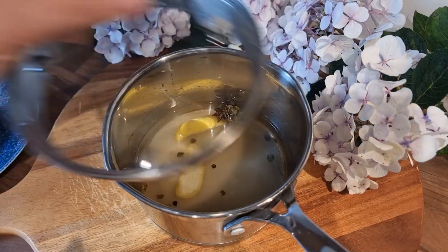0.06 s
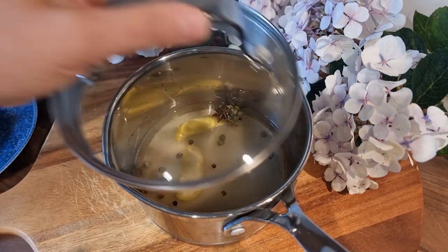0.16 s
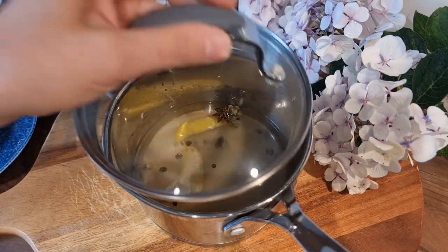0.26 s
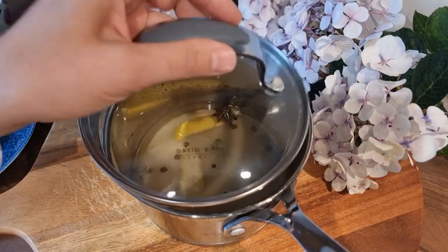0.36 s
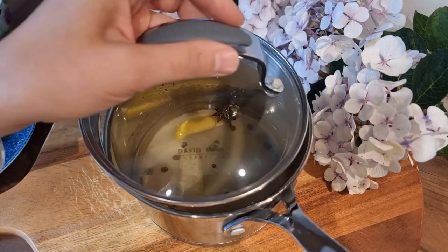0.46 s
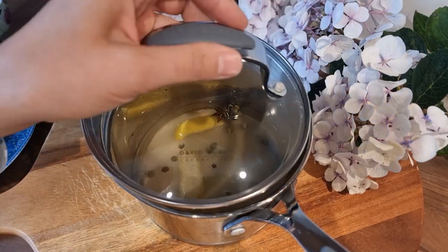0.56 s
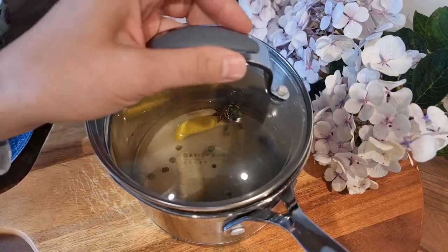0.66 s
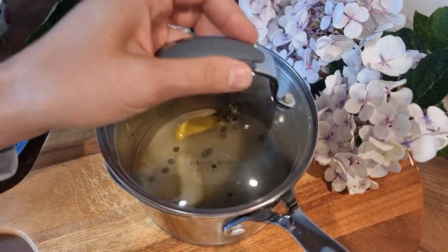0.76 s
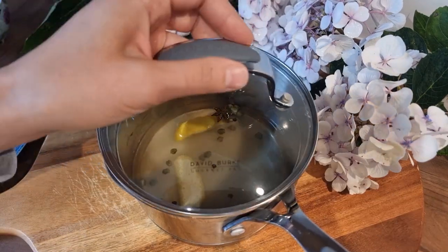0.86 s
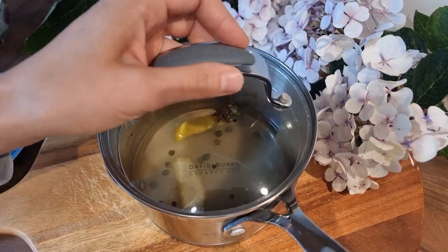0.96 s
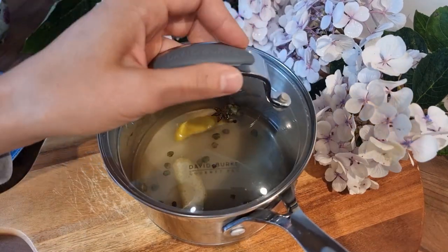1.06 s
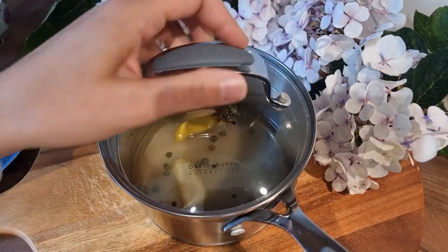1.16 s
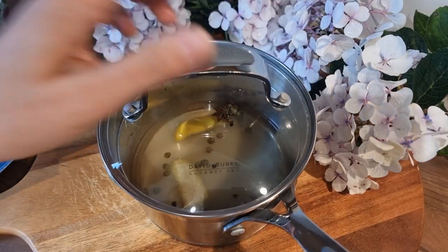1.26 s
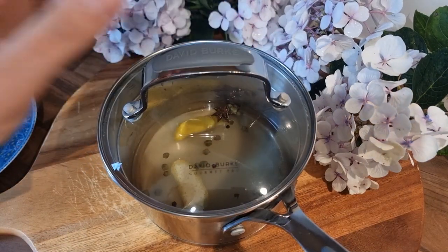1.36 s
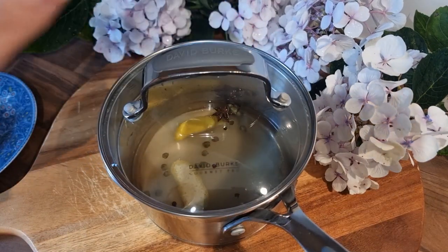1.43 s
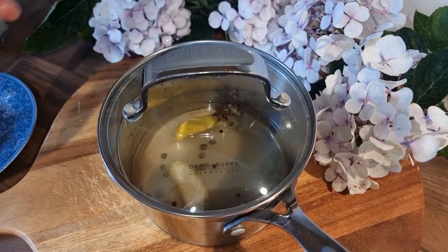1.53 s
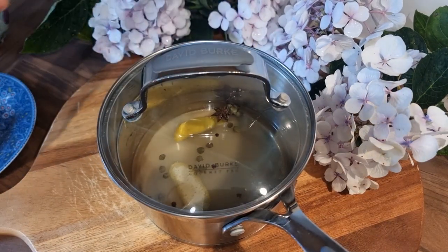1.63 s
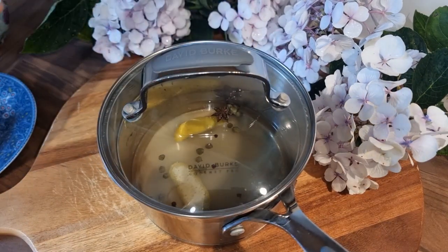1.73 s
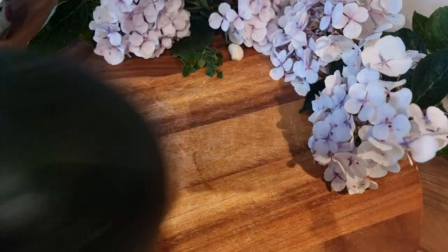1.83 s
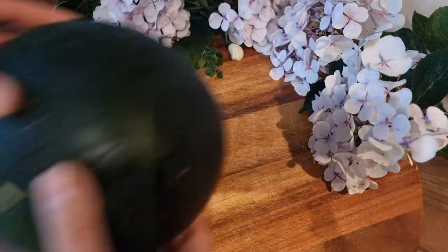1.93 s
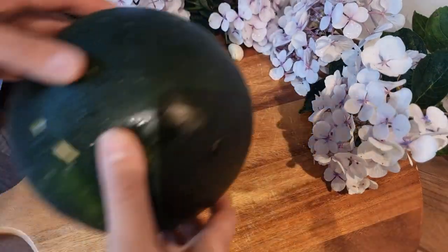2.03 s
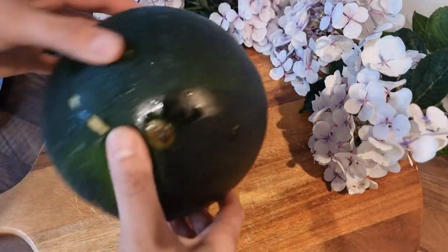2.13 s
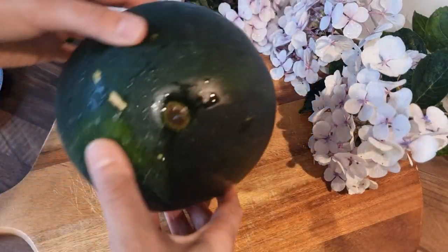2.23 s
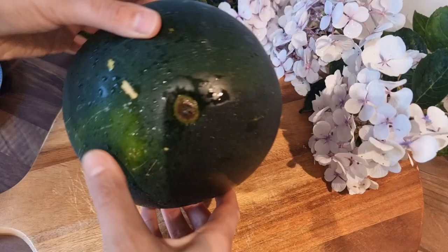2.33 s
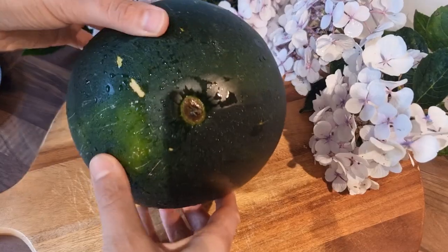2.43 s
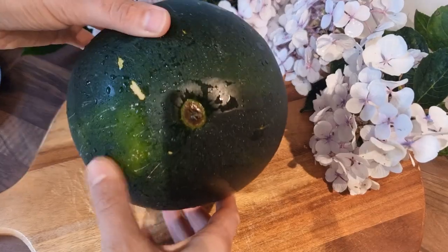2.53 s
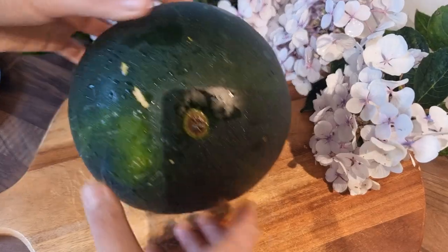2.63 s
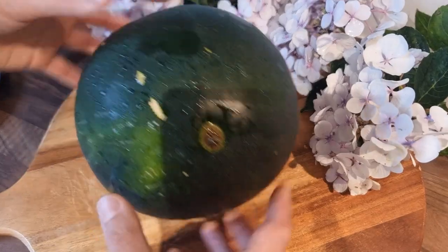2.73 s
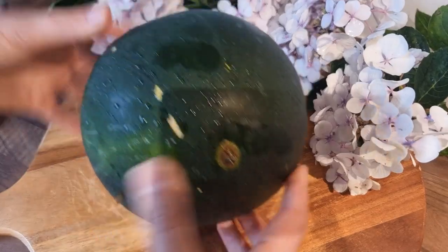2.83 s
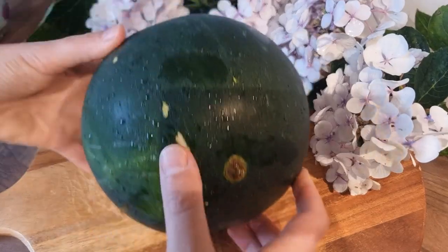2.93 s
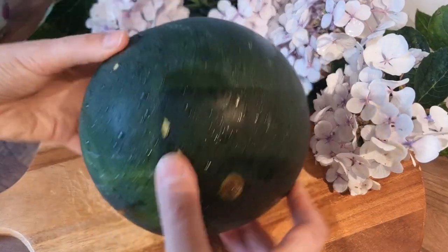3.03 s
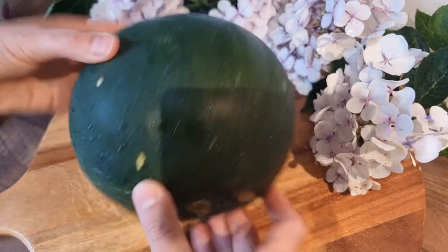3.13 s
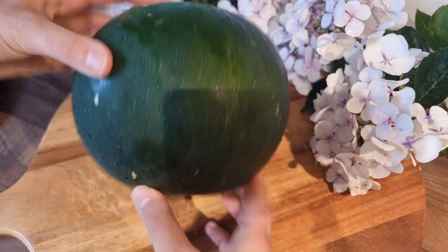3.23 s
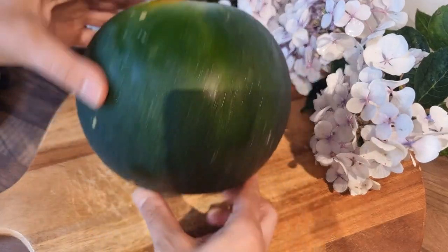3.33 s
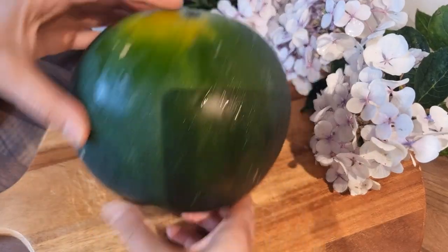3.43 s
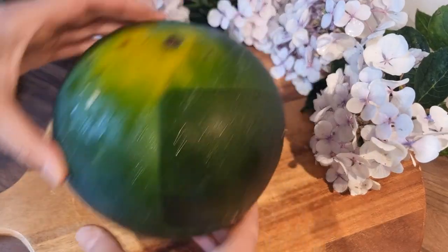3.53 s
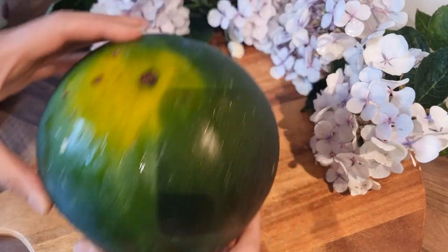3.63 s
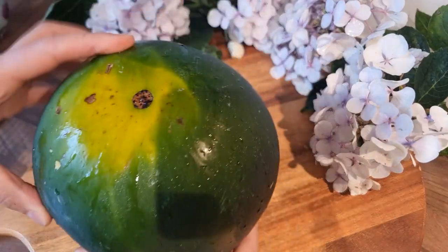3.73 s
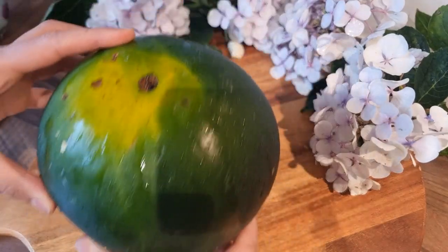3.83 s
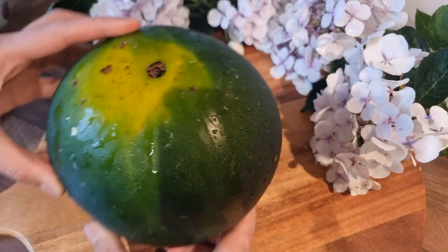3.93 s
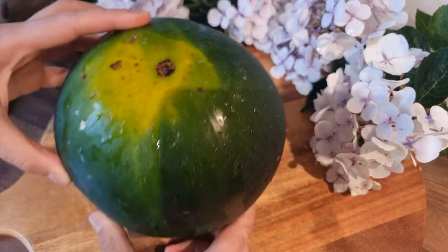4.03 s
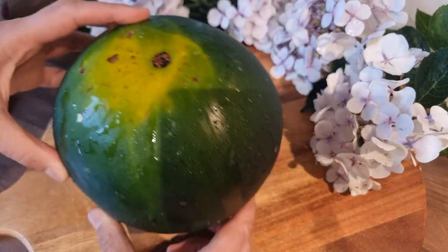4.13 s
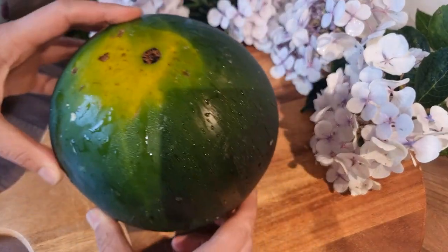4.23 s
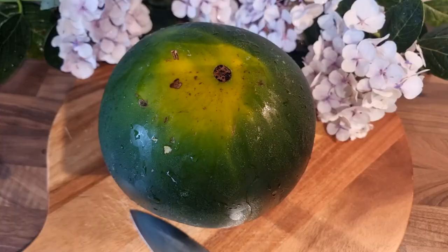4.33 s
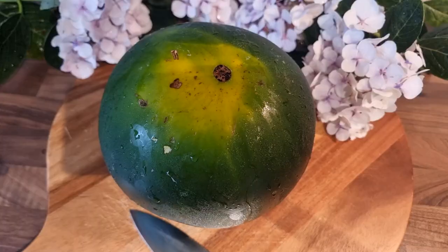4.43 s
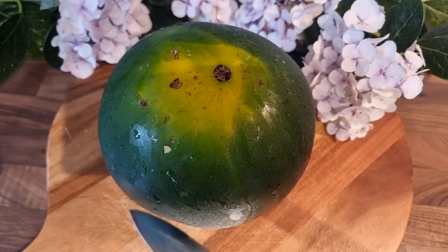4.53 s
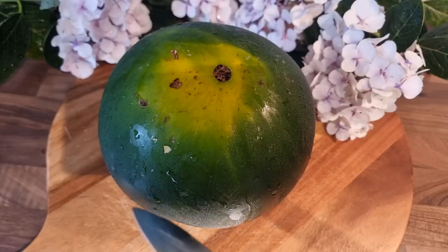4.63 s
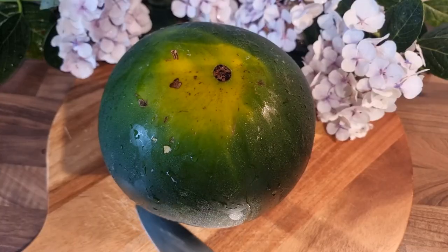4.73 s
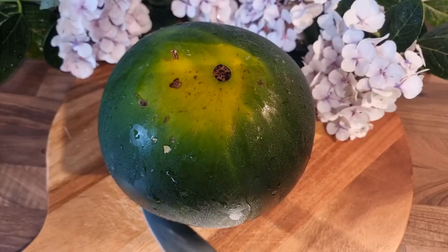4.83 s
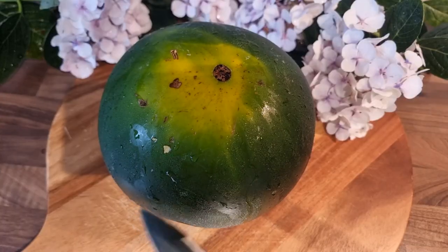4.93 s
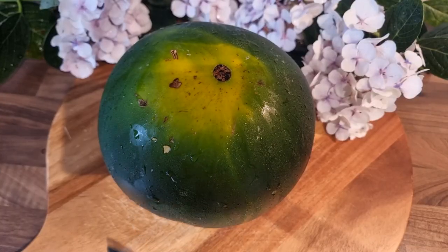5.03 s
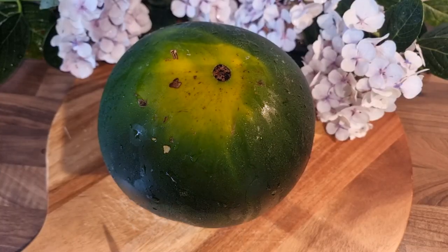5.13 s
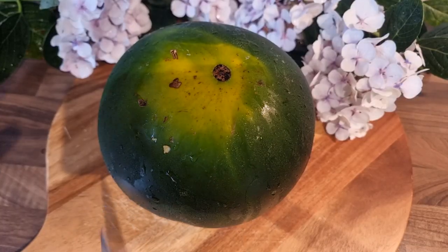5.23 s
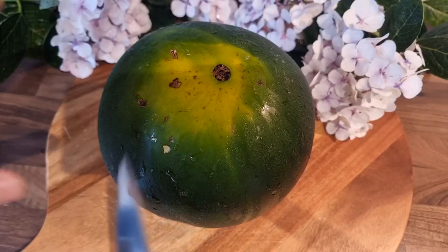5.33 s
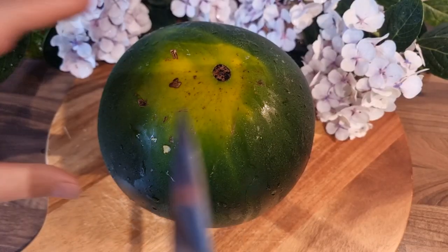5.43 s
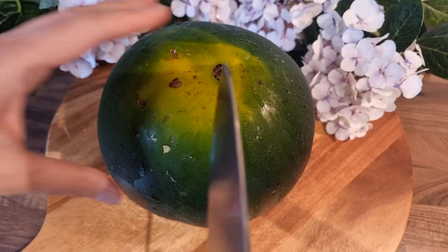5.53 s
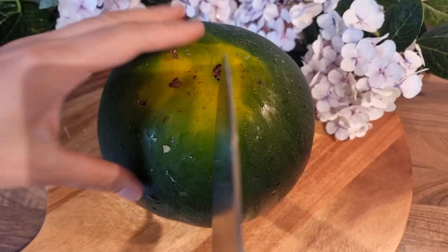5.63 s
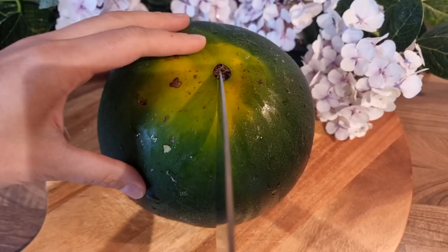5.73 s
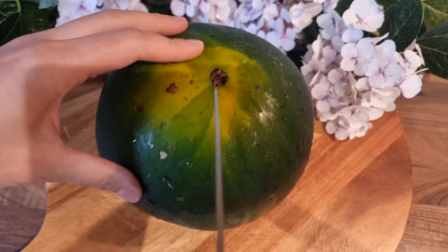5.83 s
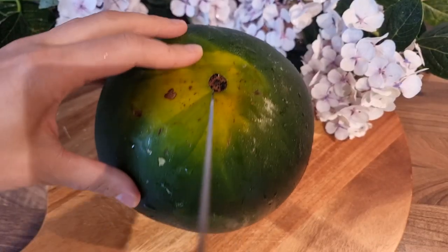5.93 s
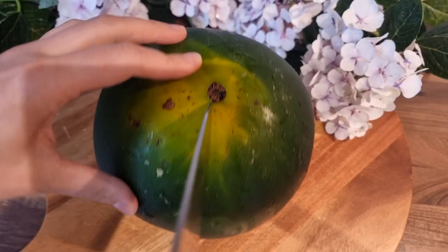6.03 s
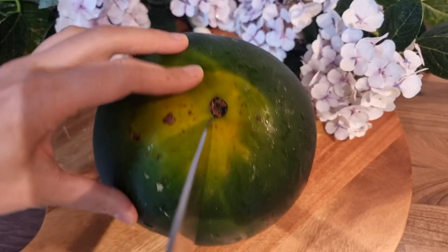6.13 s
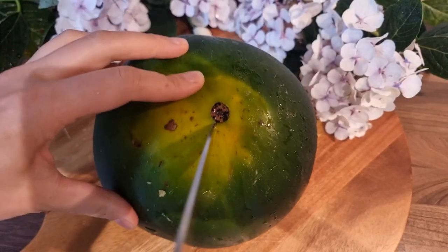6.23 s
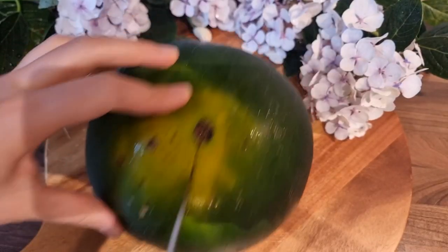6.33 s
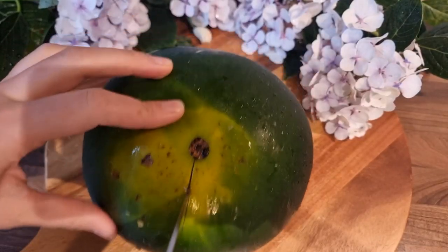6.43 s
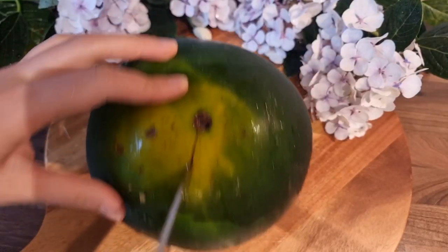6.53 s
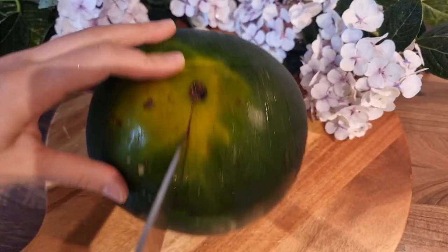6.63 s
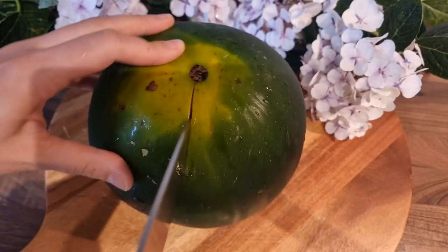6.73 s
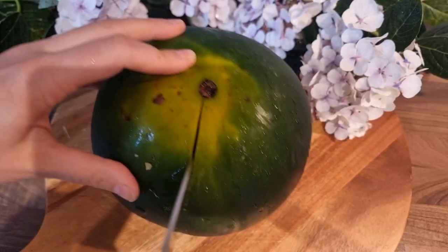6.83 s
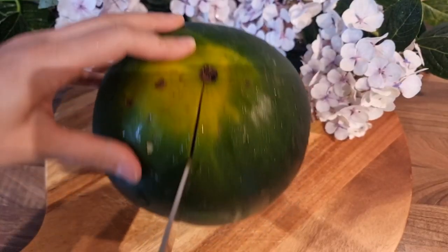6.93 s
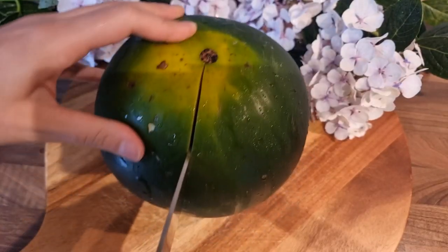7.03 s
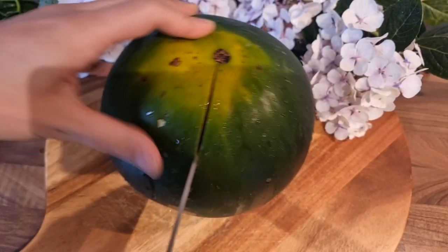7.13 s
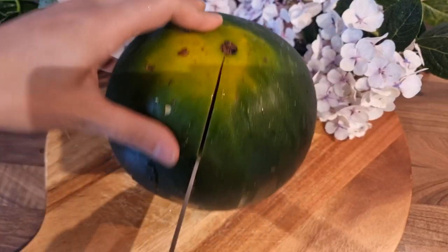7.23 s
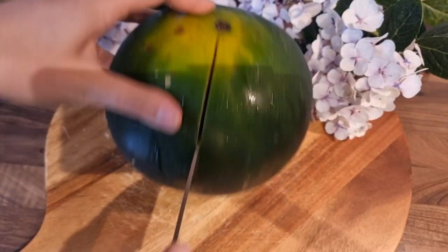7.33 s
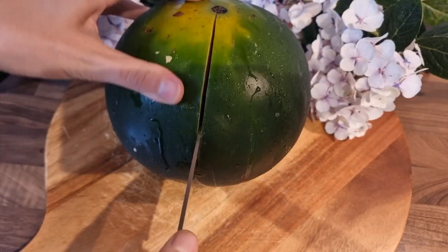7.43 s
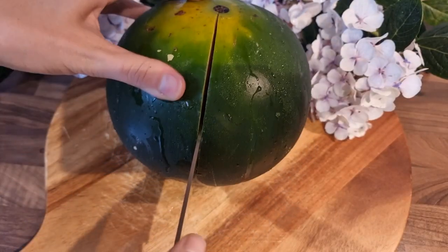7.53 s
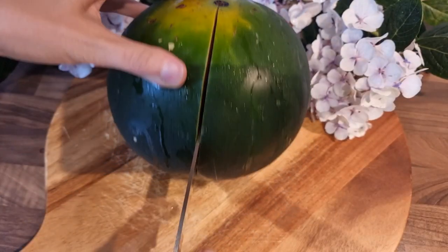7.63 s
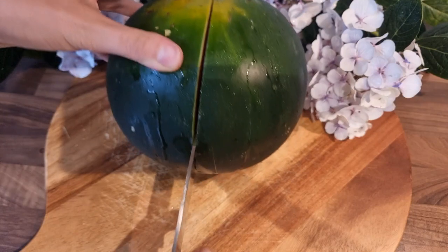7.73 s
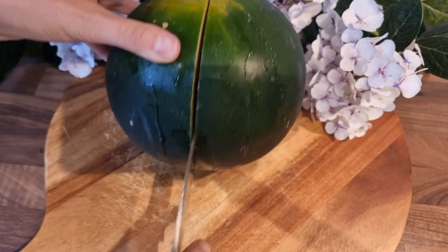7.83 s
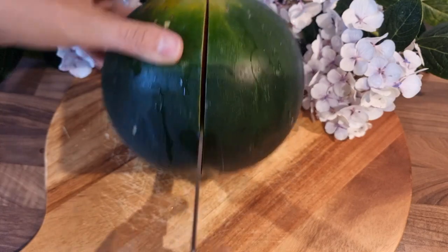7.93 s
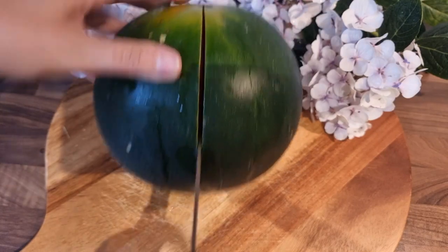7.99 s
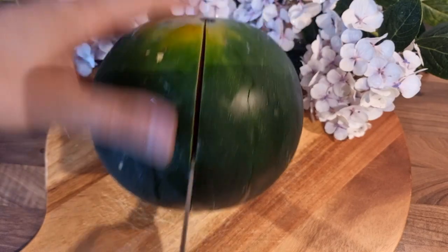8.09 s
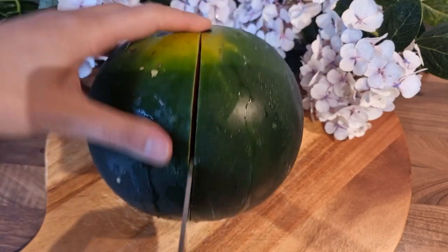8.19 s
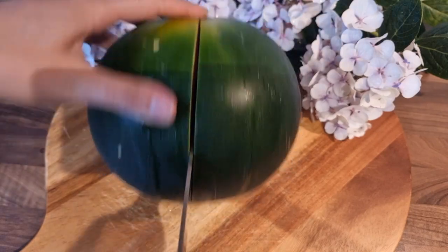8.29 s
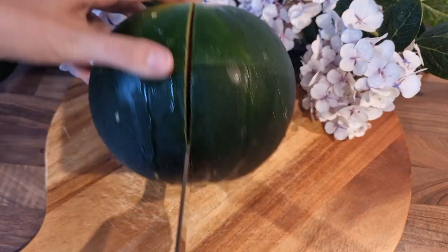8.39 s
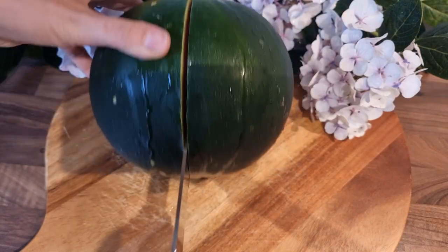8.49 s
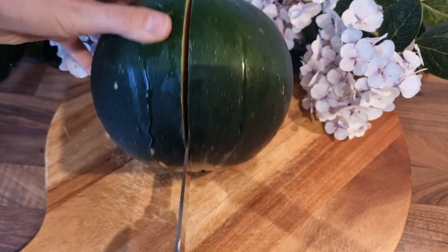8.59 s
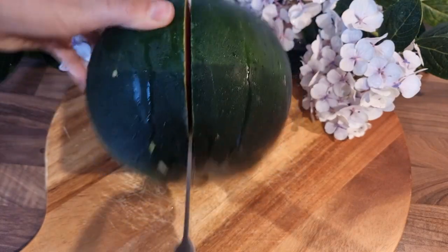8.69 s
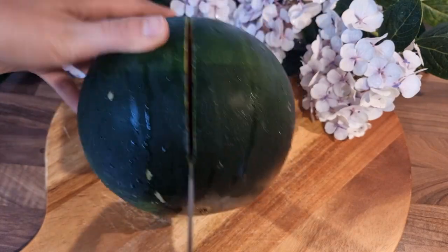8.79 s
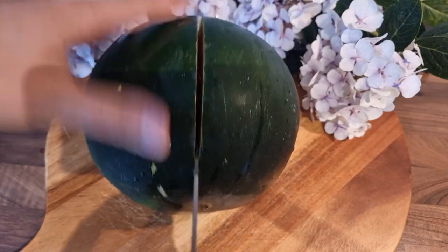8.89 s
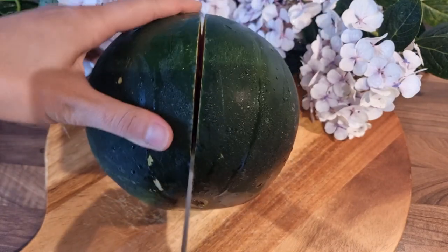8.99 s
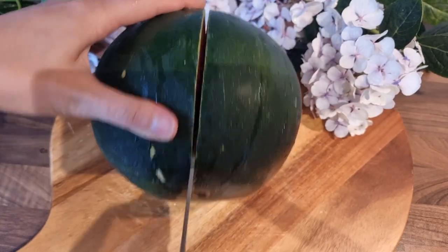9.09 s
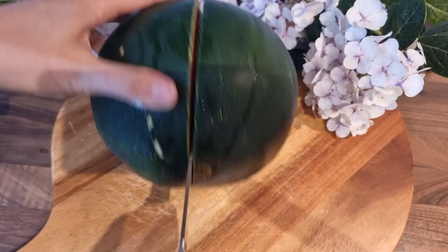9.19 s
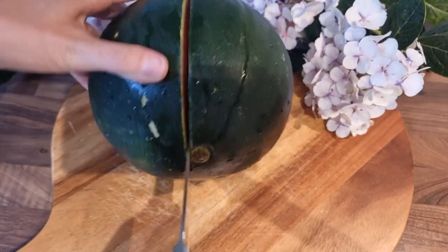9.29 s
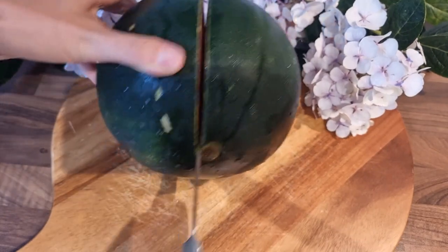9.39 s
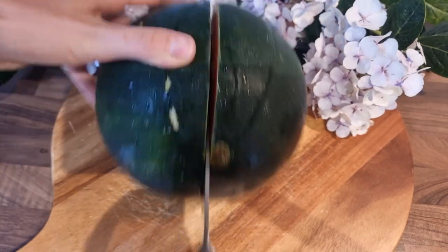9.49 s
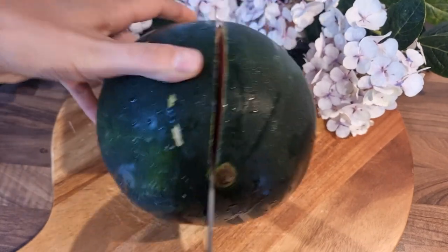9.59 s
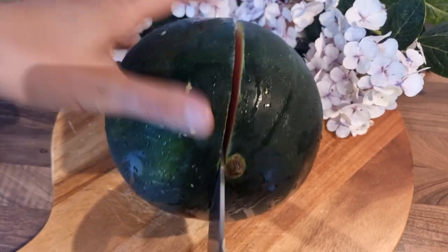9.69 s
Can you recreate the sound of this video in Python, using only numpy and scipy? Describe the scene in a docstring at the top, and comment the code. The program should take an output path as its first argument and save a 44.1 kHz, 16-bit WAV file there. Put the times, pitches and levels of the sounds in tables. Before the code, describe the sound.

Pan lid rattles into place, a short silence, soft bumps of a heavy melon on wood, then crisp, wet splitting cracks under a knife.

```python
"""Saucepan lid and watermelon in a kitchen

Two scenes. First a glass lid rattles into place on a steel saucepan: damped modes of rim and pan, and sliding noise.
Then a watermelon is turned on a wooden board, a knife is picked up and splits the rind: board and blade modes,
bursts of spikes and splinter noise that ring the fruit, and gritty tearing. Diffuse noise makes the air and
the appliance hiss, wavering sines the hum. The sound fades to silence and back twice, once between the scenes."""
import sys
import numpy as np
from scipy import signal
from scipy.fft import rfft, irfft, next_fast_len
from scipy.io import wavfile
from scipy.ndimage import map_coordinates

SR = 44100
rng = np.random.default_rng(int(sys.argv[2]) if len(sys.argv) > 2 else 0)


def int16_out(signal):
    """Quantize to a 16-bit WAV file."""
    q = np.round(np.clip(np.atleast_2d(signal).T, -1, 1) * 32767)
    wavfile.write(sys.argv[1], SR, q.astype(np.int16))


N = 429975

# All table levels are relative: the sources offset them and the output gain follows.
# Lid meeting the rim: start_s, level_db, thud_re_clink_db
LID_CONTACTS = [(0.3883, -19.5, 2), (.397, -17.5, -5), (.411, -18, -2.5), (.422, -21, -1.5),
                (.436, -37.5, -11.5), (0.529, -28.5, -14), (.544, -29.5, 0), (.739, -41.5, -4.5),
                (.79, -29.5, -8), (0.8053, -13.5, 3.5), (.822, -24.5, 4), (.950, -27, -4.5),
                (.956, -25, -4), (.963, -19, -1.5), (.975, -19, 1), (.990, -29.5, 3), (1.015, -39.5, 2.5)]
# Where the lid lands; thuds mostly deepen, clinks jump between bright and dull:
# time_s, thud_centre_hz, clink_centre_hz
LID_SEATING = [(.39, 416, 3240), (0.41, 410, 4730), (.422, 400, 2380), (.54, 437, 2870), (.74, 400, 2400),
               (.79, 310, 6170), (0.804, 310, 2240), (.83, 313, 2340), (.97, 255, 1270)]
# Modes of rim and lid: pitch_hz, level_db, t60_s
RIM_MODES = [(1033, 0, 0.056), (1305, -4.5, .1), (1367, -6, 0.14), (1401, -9, 0.11), (1645, -7.5, 0.06),
             (1880, -13.5, 0.051), (2170, -17, 0.08), (2347, -8.5, 0.12), (2413, -8.5, 0.13),
             (2570, -14.5, 0.17), (2740, -22, 0.18), (3284, -10.5, 0.13), (4000, -17, .2),
             (4720, -14, 0.16), (4870, -17, 0.12), (5100, -18, .12), (5800, -20.5, .15), (6170, -11.5, .15),
             (6900, -9, 0.19), (7550, -15, 0.15)]
# Modes of pan, liquid and the board under it: pitch_hz, level_db, t60_s
PAN_MODES = [(75, -3, .2), (117.1, -1.5, 0.28), (195, -4.5, 0.15), (251, -1.5, 0.1), (300.5, 0.5, 0.082),
             (383.4, -1.5, 0.09), (471, -1, 0.078), (563, 0, 0.11), (701, -2, 0.069), (783, 3.5, 0.075),
             (843, -0.5, 0.12)]
# Top of the clatter spectrum: frequency_hz, level_db
CLATTER_TOP = [(7000, -5.0), (9500, -5.0), (14500, 0.5), (16300, -21)]
# Lid sliding on the rim: time_s, level_db
LID_SLIDE = [(.45, -68), (.6, -64), (.675, -59), (.71, -47.5), (.758, -50.5), (.785, -57.5), (.83, -51.5),
             (.9, -56.5), (.936, -55), (1.1, -79.5)]
# Resonances of the rim under the sliding lid: centre_hz, width_hz, level_db
SCRAPE_BANDS = [(370, 59, -6.5), (1410, 120, -15.5), (2350, 260, -4), (3300, 110, -20), (3970, 120, -20),
                (4900, 320, -22)]
# Cracks of the rind: start_s, level_db, fruit_re_crack_db
RIND_CRACKS = [(6.336, -18.5, -12.5), (6.3428, -29.5, -17), (6.4984, -30, -19), (6.699, -38, -19),
               (6.749, -34, -13), (6.7621, -24, -22), (6.7805, -23, -21.5), (6.796, -24, -25),
               (6.8203, -21, -28), (6.8422, -24, -17), (6.8644, -25, -28), (6.898, -23.5, -26),
               (6.9191, -21, -22), (6.9571, -20, -18.5), (6.9936, -21, -26.5), (7.0613, -22.5, -54),
               (7.1446, -23, -29), (7.184, -22.5, -28), (7.237, -18.5, -26), (7.2759, -15, -27),
               (7.3124, -17, -31), (7.3476, -12.5, -22), (7.4082, -15, -24.5), (7.57, -37, -26),
               (7.5852, -15.5, -25), (7.635, -15.5, -24.5), (7.661, -15.5, -24.5), (7.6869, -17.5, -24),
               (7.792, -12.5, -27), (8.3788, -16.5, -23.5), (8.4264, -19.5, -22), (8.4495, -18.5, -23.5),
               (8.4878, -19, -29), (8.497, -21, -30), (8.512, -14.5, -25.5), (8.55, -17.5, -25.5),
               (9.0883, -30.5, -20.5), (9.11, -25.5, -31), (9.133, -14.5, -18.5), (9.1452, -10.5, -22),
               (9.184, -8.5, -15.5), (9.2178, -9, -20), (9.2356, -15, -15.5), (9.2458, -29, -31),
               (9.272, -21.5, -22.5)]
# Spectrum of snapping rind: frequency_hz, density_db (per Hz)
SNAP_SPECTRUM = [(150, -28), (300, -12), (580, -26), (850, -12), (1050, -17.5), (1400, -9.5), (3500, -8),
                 (4800, -13), (6900, -15), (9200, -22.5), (11000, -22.5), (13000, -16.5), (15500, -19),
                 (16500, -46.5)]
# How thin the cracks sound along the cut: time_s, bass_cut_db_per_octave (below 6 kHz)
CRACK_BASS_CUT = [(6.34, 10), (6.5, -0.5), (6.9, -0.5), (7.3, -1), (7.8, -1), (8.43, 1.5), (8.55, 3.5),
                  (9.13, -0.5)]
# Modes of the hollow fruit: pitch_hz, level_db, t60_s
FRUIT_MODES = [(150, -9.5, 0.068), (247, -11, 0.18), (365, -7.5, 0.064), (575, 5, 0.063), (860, 13, 0.033),
               (1201, 9.5, 0.035), (1870, 0, 0.055), (2700, -1, 0.035), (3650, -4, 0.025)]
# Bright pings with some cracks: start_s, level_db, pitch_hz, t60_s
CRACK_PINGS = [(6.337, -28, 6660, 0.024), (7.0637, -33.5, 6500, 0.063)]
# Pushes of the blade: start_s, end_s, tearing_db
BLADE_PUSHES = [(6.762, 6.917, -47), (7.213, 7.313, -51), (7.605, 7.714, -49.5), (8.104, 8.11, -60),
                (8.381, 8.503, -50), (9.111, 9.2, -47)]
# Squeaks of the tip going in: time_s, level_db, pitch_hz
TIP_SQUEAKS = [(6.278, -45, 4150), (6.287, -39, 4000), (6.299, -48, 4040), (6.317, -35, 3900)]
# Modes of the knife blade: pitch_hz, level_db, t60_s
BLADE_MODES = [(1435, -5, 0.13), (2600, 16.5, 0.028), (3440, 1, 0.16), (5636, -7, .15), (5916, -6, 0.32),
               (7200, -17, .2), (7800, -24, .15)]
# Fruit, hands and knife on the board:
# start_s, level_db, pitch_hz, tick_re_bump_db, left_minus_right_db, rise_s (time constant)
BOARD_BUMPS = [(2.054, -28, 390, -21, 2, 0.003), (2.054, -40, 973, -6, -2, .002),
               (2.078, -28, 350, -15, -2, 0.0075), (2.135, -38, 616, -6.5, -1, 0.0034),
               (2.136, -31, 83.4, -27, 1, 0.0049), (2.174, -29, 100, -30, -6, 0.0053),
               (2.866, -34, 205, -8, -2, 0.0025), (2.867, -32, 1900, -30, -2, .001),
               (2.866, -36, 3350, -30, -5, .001), (2.884, -32.5, 1890, -1, -1, 0.00068),
               (2.925, -38, 570, -18, -3, .0026), (3.299, -37, 69.6, -20, 11, 0.0057),
               (3.5155, -20, 778, -22, -5.5, 0.005), (3.537, -39, 790, -18, -5, .006),
               (4.645, -33.5, 687, -7, -11, 0.011), (4.664, -31, 214, -7, -2, 0.018),
               (4.682, -33.5, 546, -20, -5, 0.0064), (4.835, -39, 780, -20, 3, 0.0092),
               (4.855, -32, 548, -20.5, 1, .008), (4.87, -35.5, 193, -25, -1, 0.0058),
               (4.905, -41, 188, -27, -2, 0.0054), (4.955, -39.5, 254, 5, -2, 0.0084),
               (5.697, -30.5, 308, -6, 1.5, 0.00051), (5.703, -28.5, 235, -32, -5, 0.0029),
               (5.929, -49, 298, 5, -4, 0.011), (7.351, -36, 251, -31, -1, 0.0037),
               (8.82, -42, 790, -21, -6, 0.007), (8.97, -37, 613, -17, 2, 0.0077),
               (9.2, -30, 154, -28, -2, 0.0043)]
# Damping of the board: frequency_hz, t60_s
BOARD_DAMPING = [(60, 0.16), (120, 0.08), (240, 0.17), (310, 0.15), (380, 0.053), (800, 0.05), (1900, .07)]
# Spectrum of a bump's hard edge: frequency_hz, density_db (per Hz)
TICK_SPECTRUM = [(200, -14), (700, -2), (1150, 4.5), (1450, 1), (1900, 3), (2500, -2), (3300, -6.5),
                 (4000, -6), (4700, -5), (6000, -10), (9000, -21), (14000, -26.5)]
# Handling of the fruit: time_s, rumble_db
HANDLING = [(1.9, -62), (2.05, -52.5), (2.2, -55.5), (2.58, -60.5), (3.0, -56), (3.15, -54), (3.3, -57),
            (3.7, -58.5), (4.3, -60), (4.75, -56), (5.1, -59.5), (5.9, -55), (6.2, -57), (7.35, -54.5),
            (7.95, -56.5), (9.2, -54.5), (9.75, -56.5)]
# Spectrum of the fruit rumbling: frequency_hz, density_db (per Hz)
RUMBLE_SPECTRUM = [(12, -37), (20, -13), (60, -5.5), (173, -4.5), (296, -17.5), (400, -63), (520, -58.5),
                   (880, -120)]
# Spectrum of wet rind rubbing: frequency_hz, density_db (per Hz)
RUB_SPECTRUM = [(180, -15), (300, -4), (354, -12), (656, -6), (2050, -14), (8000, -28), (10400, -52),
                (17600, -120)]
# Decay of the room: frequency_hz, t60_s
WALL_DECAY = [(150, 0.42), (1000, 0.22), (5000, 0.21), (14000, 0.18)]
# Spectrum of the air at the stove: frequency_hz, density_db (per Hz)
AIR_SPECTRUM = [(20, -24), (40, -12.5), (72, -15.5), (102, -8.5), (130, -17), (400, -25), (800, -30),
                (2000, -43.5), (7000, -49.5), (9000, -61), (16000, -57)]
# Level of the air and of the room dying away after the lid's hits: time_s, bass_db, treble_db (above 300 Hz)
AIR_LEVEL = [(0, -69, -75.5), (.37, -70, -73), (.5, -54, -62.5), (1.1, -62, -62), (1.3, -64, -66),
             (1.6, -62.5, -68.5)]
# Spectrum of the appliance hiss at the board: frequency_hz, density_db (per Hz)
HISS_SPECTRUM = [(180, -14), (300, -7.5), (366, 0), (478, -9.5), (749, -8), (1030, -16.5), (1120, -7.5),
                 (1460, -14.5), (2030, -9.5), (2520, -17), (4440, -20), (5520, -20), (6520, -26.5),
                 (10700, -28.5), (16000, -23.5)]
# Narrow bands in the hiss: centre_hz, width_hz, height_db
HISS_WHINES = [(2090, 370, 10.5), (4415, 140, 10), (6724, 950, 13), (13400, 300, 7), (15600, 300, 7)]
# Level of the hiss: time_s, level_db
HISS_LEVEL = [(1.9, -61), (4.35, -60), (4.4, -62), (4.6, -63), (6, -61), (9.75, -59.5)]
# Mains hum and one faint whine: pitch_hz, level_db
HUM_TONES = [(49.5, -62), (99.5, -62.5), (1780, -91.5)]
# Likeness of left and right in diffuse noise: frequency_hz, correlation (no unit)
STEREO_LIKENESS = [(60, 0.65), (180, 0.73), (550, -0.37), (1650, -0.26), (4970, -0.0082), (15000, -0.1)]
# Fades to silence and back: fade_start_s, silence_start_s, silence_end_s, fade_end_s
FADES = [(1.592, 1.6, 1.915, 1.935), (4.338, 4.367, 4.386, 4.418)]

MIX_DB = 3  # spread of mode strengths from strike to strike
SHALLOW_DB, THINNING = -38, 3.1  # a crack ringing the fruit less loses bass: dB per octave for each dB below
PUSH_RISE, PUSH_FALL = 270, 93  # dB per s
DRAG_DB = -4.5  # wet rind dragging on the blade, over the tearing
PIERCE_START_S, PIERCE_END_S, PIERCE_DB = 6.274, 6.36, -40  # tip crunching into the rind
PIERCE_RISE, PIERCE_FALL = 8600, 1500  # dB per s
SQUEAK_RISE, SQUEAK_FALL = 2800, 1040  # dB per s
BLADE_TAP_S, BLADE_TAP_DB = 4.968, -47
RUB_DB, RUB_GROWS = -64.5, 2.47  # rub at -56 dB in HANDLING; dB of rub per dB of rumble
OUTPUT_GAIN_DB, TOP_HZ = 2.5, 16800


def lid():
    """Modal excitation: each contact clinks the rim and thuds the pan, and sliding friction makes noise."""
    out = np.zeros((2, N))
    when, thuds_hz, clinks_hz = np.transpose(LID_SEATING)
    for s, db, thud_db in LID_CONTACTS:
        thud_hz = np.interp(s, when, thuds_hz)
        clink_hz = np.interp(s, when, clinks_hz)
        pan_modes = around(PAN_MODES, thud_hz, slope_db=8)
        thud = ring(pan_modes, scatter_db=1.5, attack=0.00041, lag=.0005, seconds=.3, blur_hz=7.3)
        add(out, s, amp(db + thud_db - 6.0) * thud)
        rim_modes = around(RIM_MODES, clink_hz, slope_db=8.5, nearest_db=4)
        clink = ring(rim_modes, scatter_db=MIX_DB, attack=0.00065, detune=.004, seconds=.3, blur_hz=20)
        add(out, s, amp(db - 8) * clink)
        clatter = lambda hz: -9 * abs(np.log2(hz / clink_hz + 0.011)) + along(CLATTER_TOP, hz)
        add(out, s, amp(db - 16.5) * puff(0.13, clatter, seconds=0.14))

    def scrape(f):
        bands = sum(amp(db) / (1 + ((f - hz) / width * 2) ** 2) for hz, width, db in SCRAPE_BANDS)
        return 20 * np.log10(0.027 + bands)

    slide_db = curves(LID_SLIDE, -120)[0] + 2.9 * wobble(22)
    return out + amp(slide_db) * rush(scrape, grain_db=1.0)


def cracks():
    """Brittle fracture: a pressure spike, a spray of splinters and the hollow ring of the fruit."""
    out = np.zeros((2, N))
    for s, db, fruit_db in RIND_CRACKS:
        cut_db = np.interp(s, *np.transpose(CRACK_BASS_CUT))
        tilt_db = cut_db + THINNING * max(SHALLOW_DB - fruit_db, 0)
        colour = lambda hz: along(SNAP_SPECTRUM, hz) + tilt_db * np.minimum(np.log2(hz / 6000 + .01), 0)
        sharp = lambda hz: colour(hz) + 4 * np.log2(hz / 4000 + 0.012)
        add(out, s - .0008, amp(db + 1.5) * spike(sharp))
        add(out, s + 0.00057, amp(db - 14.5) * puff(0.0054, sharp))
        add(out, s + .0005, amp(db - 11.0) * puff(0.044, colour))
        hollow = ring(FRUIT_MODES, scatter_db=MIX_DB / 2, attack=0.00082, detune=0.023,
                      lag=0.0003, seconds=0.13, unlike_hz=3960)
        add(out, s + 0.00206, amp(db + fruit_db - 2) * hollow)
    for s, db, hz, t60 in CRACK_PINGS:
        add(out, s, amp(db) * puff(t60, lambda f: -22 * abs(np.log2(f / hz + .01))))
    return out


def tearing():
    """Friction and tearing: gritty noise while the blade moves, short squeaks as its tip goes in."""
    push = sum(swell(*row, PUSH_RISE, PUSH_FALL) for row in BLADE_PUSHES)
    force = push + swell(PIERCE_START_S, PIERCE_END_S, PIERCE_DB, PIERCE_RISE, PIERCE_FALL)
    squeak_gain = sum(swell(s, s, db, SQUEAK_RISE, SQUEAK_FALL) for s, db, hz in TIP_SQUEAKS)
    turns = np.cumsum(curves(TIP_SQUEAKS)[1] * (1 + .03 * wobble(900))) / SR
    # the fruit answers near its strongest mode
    groan_turns = np.cumsum(900 * (1 + .07 * wobble(300))) / SR
    groan = 0.81 * np.sin(2 * np.pi * groan_turns)
    squeak = squeak_gain * amp(3.8 * wobble(300)) * (np.sin(2 * np.pi * turns) + groan)
    drag = push * amp(DRAG_DB) * rush(lambda f: along(RUB_SPECTRUM, f))
    grit = force * amp(1.6 * wobble(60)) * rush(lambda f: along(SNAP_SPECTRUM, f), grain_db=1.0)
    return grit + drag + squeak * amp([[2], [-2]])  # squeaks lean left


def blade():
    """Free vibration of a plate: the knife tings once as it is picked up."""
    out = np.zeros((2, N))
    ting = ring(BLADE_MODES, scatter_db=0.2, attack=0.0032, detune=0, lag=0, unlike_hz=9000)
    add(out, BLADE_TAP_S, amp(BLADE_TAP_DB) * ting)
    brush = puff(0.062, lambda f: -7 * abs(np.log2(f / 4200 + .01)))
    add(out, BLADE_TAP_S, amp(BLADE_TAP_DB + 2.5) * brush)
    return out


def board():
    """Contact stiffness: bumps ring the board near their pitch, soft ones more broadly, with a tick on top."""
    out = np.zeros((2, N))
    t = np.arange(int(.4 * SR)) / SR
    for s, db, hz, tick_db, pan_db, rise in BOARD_BUMPS:
        t60 = along(BOARD_DAMPING, hz)
        soft = min(rise / .02, 1)  # a slower contact rings less and thuds more broadly
        tone = ring([(hz, -1.5, t60)], scatter_db=-1.5, attack=0.0019, detune=0.0077,
                    lag=0.00017, unlike_hz=9000)
        tone = amp(-4.5 - 3.1 * soft) * tone
        thud = lambda f: (14 * soft - 26) * abs(np.log2(f / hz + 0.015))
        smear = amp(-16.5 + 10.4 * soft) * puff(t60, thud, seconds=.4)[0]
        tick = amp(tick_db - 5.5) * puff(0.065, lambda f: along(TICK_SPECTRUM, f), seconds=.4)
        gain = amp(db + pan_db * np.array([[.5], [-.5]]))
        add(out, s, gain * (tone + smear + tick) * (1 - np.exp(-t / rise)))
    return out


def hands():
    """Rolling and rubbing noise: the heavy fruit rumbles on the board, wet rind rubs under the fingers."""
    rumble_db, = curves(HANDLING, -120)
    rub_db = RUB_DB + RUB_GROWS * (rumble_db + 56)
    rumble = amp(rumble_db - 2 + 1.5 * wobble(12)) * rush(lambda f: along(RUMBLE_SPECTRUM, f))
    rub = amp(rub_db + 2.8 * wobble(9.5)) * rush(lambda f: along(RUB_SPECTRUM, f), grain_db=-0.5)
    return rumble + rub


def walls(x):
    """Reverberation: each frequency of the room's answer dies at its own speed."""
    hz, t, z = signal.stft(rng.standard_normal((2, SR // 2)), SR, nperseg=256)
    decay = amp(-60 * t / along(WALL_DECAY, hz)[:, None])
    tail = signal.istft(z * decay, SR, nperseg=256)[1]
    x = filtered(x, lambda f: f / np.hypot(f, 400))  # the room's answer is kept weak in the bass
    return signal.fftconvolve(x, tail / np.linalg.norm(tail[0]), axes=1)[:, :N]


def kitchen():
    """Diffuse noise and steady tones: air and dying room at the stove, hiss at the board, unsteady hum."""
    whines = lambda f: sum(db / (1 + ((f - hz) / width * 2) ** 2) for hz, width, db in HISS_WHINES)
    bass_db, treble_db = curves(AIR_LEVEL, -120)
    bass = rush(lambda f: along(AIR_SPECTRUM, f) - 60 * (f > 300))
    treble = rush(lambda f: along(AIR_SPECTRUM, f) - 60 * (f <= 300))
    air = amp(bass_db) * bass + amp(treble_db) * treble
    hiss_db = curves(HISS_LEVEL, -120)[0] + 1.7 * wobble(3.33)
    hiss = amp(hiss_db) * rush(lambda f: along(HISS_SPECTRUM, f) + whines(f))
    hum = 0
    for hz, db in HUM_TONES:
        level = amp(db + 0.5 + 2.6 * wobble(3))
        hum = hum + level * np.sin(2 * np.pi * hz * np.arange(N) / SR + .5 * wobble(6.0))
    return air + hiss + hum


def ring(modes, scatter_db, attack, detune=0.018, lag=0.000383, seconds=.4, blur_hz=0, unlike_hz=1500):
    """Modal decay: damped sines at new strengths, later in phase at right; high modes differ between channels."""
    t = np.arange(int(seconds * SR)) / SR
    hz, db, t60 = np.transpose(modes)[:, :, None, None]
    phase_draw, level_draw, pitch_draw = rng.standard_normal((3, len(modes), 2, 1))
    apart = np.minimum(hz / unlike_hz, 1)
    strength = level_draw[:, :1] + apart * level_draw * [[0], [1]]
    level = amp(db + scatter_db * strength - 60 * t / t60)
    sign = np.pi * np.arange(len(modes))[:, None, None]  # neighbouring modes start in opposite directions
    phase = sign + apart * phase_draw - 2 * np.pi * hz * lag * np.array([[0], [1]])
    # loose contact blurs the spectral lines: the phase wanders
    steps = rng.standard_normal((len(modes), 1, len(t)))
    phase = phase + np.sqrt(2 * np.pi * abs(blur_hz) / SR) * np.cumsum(steps, axis=2)
    pitch = hz * (1 + detune * pitch_draw[:, :1])
    return (level * np.sin(2 * np.pi * pitch * t + phase)).sum(0) * (1 - np.exp(-t / attack))


def around(modes, centre_hz, slope_db, nearest_db=0):
    """Selective excitation: modes far from the centre are excited less, those right at it more."""
    near = lambda hz: nearest_db / (1 + ((hz / centre_hz - 1) / .04) ** 2)
    level = lambda hz, db: db - slope_db * abs(np.log2(hz / centre_hz)) + near(hz)
    return [(hz, level(hz, db), t60) for hz, db, t60 in modes]


def spike(level_db, lag=.00012, bounce=0.000443, bounce_db=[[-5], [-.7]]):
    """Reflection: a pressure spike, 2 ms in, and its bounce off the board; the left channel hears it first."""
    pulse = np.zeros((2, 256))
    pulse[:, round(.002 * SR)] = -1
    delay = lambda hz, s: np.exp(-2j * np.pi * hz * s)
    path = lambda hz: delay(hz, np.array([[0], [lag]])) * (1 + amp(bounce_db) * delay(hz, bounce))
    shape = filtered(pulse, lambda hz: amp(level_db(hz)) * path(hz))
    return shape / abs(shape).max()


def puff(t60, level_db, seconds=.1):
    """Exponential decay: a dying stereo burst of coloured noise."""
    t = np.arange(int(seconds * SR)) / SR
    noise = rng.standard_normal((2, len(t)))
    return unit(filtered(noise, lambda hz: amp(level_db(hz)))) * amp(-60 * t / t60)


def rush(level_db, grain_db=0):
    """Diffuse field: partly alike stereo noise of rms 1; level_db maps Hz to dB, grain_db makes it gritty."""
    pair = rng.standard_normal((2, N)) * amp(grain_db * wobble(700))
    turn = lambda hz: np.arccos(np.clip(along(STEREO_LIKENESS, hz), -1, 1)) / 2
    mid, side = filtered(pair, lambda hz: amp(level_db(hz)) * [np.cos(turn(hz)), np.sin(turn(hz))])
    return unit(np.array([mid + side, mid - side]))


def swell(start, end, db, rise, fall):
    """Exponential growth and decay: gain climbs to db at start, holds to end, sinks; slopes in dB per s."""
    t = np.arange(N) / SR
    return amp(db - rise * np.maximum(start - t, 0) - fall * np.maximum(t - end, 0))


def wobble(rate):
    """Slow modulation: a smooth random curve, rate knots a second."""
    knots = rng.standard_normal(int(N * rate / SR) + 4)
    return map_coordinates(knots, [np.arange(N) * rate / SR])


def curves(rows, outside=None):
    """Linear interpolation: one value per sample for each column after the time."""
    s, *cols = np.transpose(rows)
    return [np.interp(np.arange(N) / SR, s, c, outside, outside) for c in cols]


def along(points, hz):
    """Logarithmic frequency: interpolates (Hz, value) points on a log axis."""
    f, v = np.transpose(points)
    return np.interp(np.log(hz + 1), np.log(f + 1), v)


def filtered(x, response):
    """Linear filtering: the spectrum of x times a response of frequency."""
    n = x.shape[-1]
    m = next_fast_len(n + 8192)
    return irfft(rfft(x, m) * response(np.fft.rfftfreq(m, 1 / SR)), m)[..., :n]


def add(out, s, sound):
    """Superposition: mixes a sound in at time s."""
    part = out[:, round(s * SR):][:, :sound.shape[1]]
    part += sound[:, :part.shape[1]]


def amp(db):
    """Decibel law: dB to gain."""
    return 10 ** (np.asarray(db) / 20)


def unit(x):
    """Effective value: scaled to rms 1."""
    return x / np.sqrt(np.mean(x ** 2) + 1e-20)


def scene():
    """Superposition: close sources with their reverberation, over the kitchen background."""
    pot, knife, bumps = lid(), cracks() + tearing(), board()
    room = walls(amp(-6.0) * pot + amp(-7) * knife + amp(-4.5) * bumps)
    return pot + knife + bumps + blade() + room + hands() + kitchen()


def record(dry):
    """Gain and band limitation: the sound fades out and in twice, and nothing is kept above TOP_HZ."""
    t = np.arange(N) / SR
    fade = np.prod([np.interp(t, times, [1, 0, 0, 1]) for times in FADES], axis=0)
    return filtered(dry * amp(OUTPUT_GAIN_DB) * fade, lambda hz: hz < TOP_HZ)


dry = scene()
out = record(dry)
int16_out(out)
```